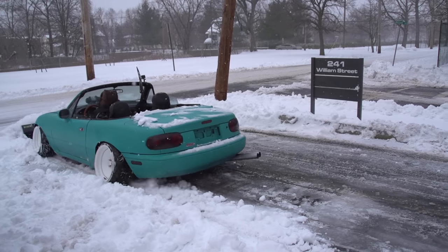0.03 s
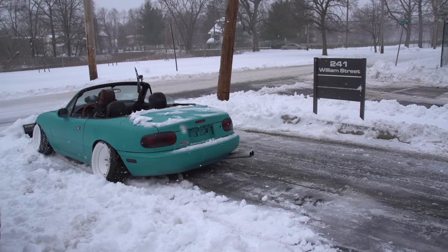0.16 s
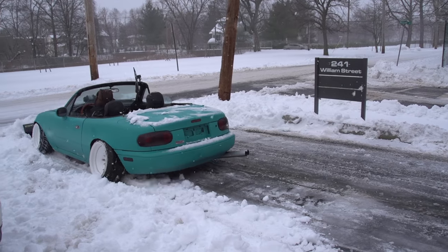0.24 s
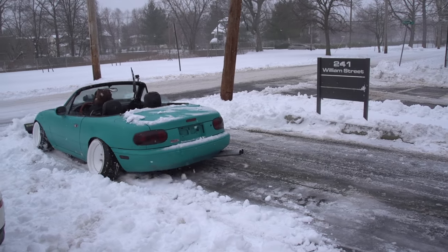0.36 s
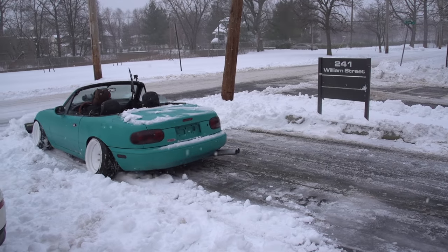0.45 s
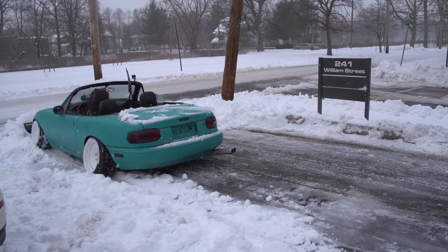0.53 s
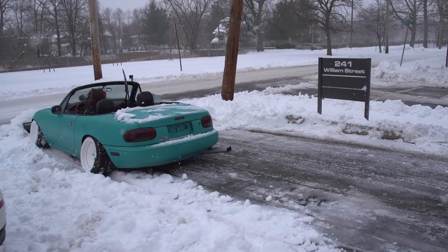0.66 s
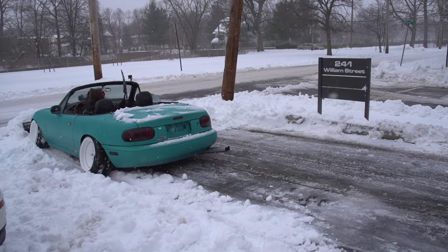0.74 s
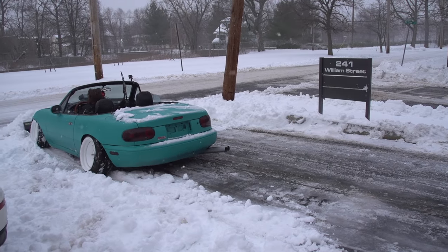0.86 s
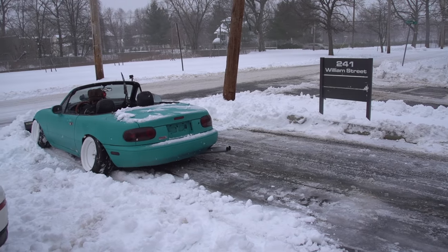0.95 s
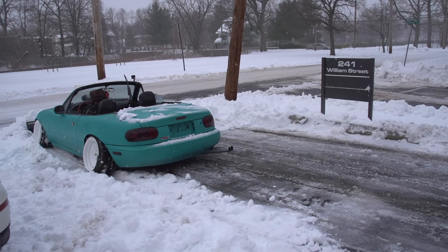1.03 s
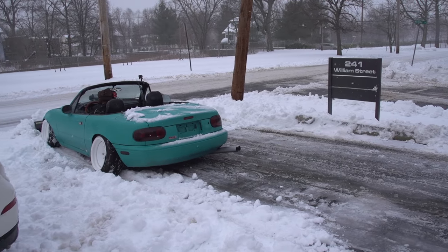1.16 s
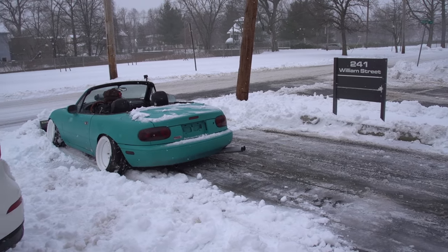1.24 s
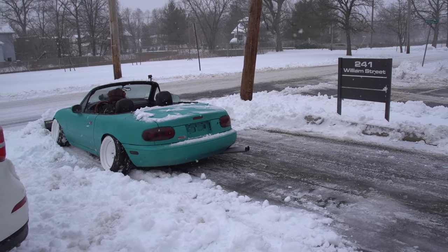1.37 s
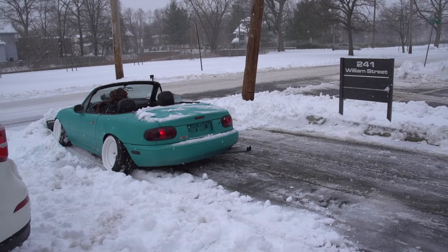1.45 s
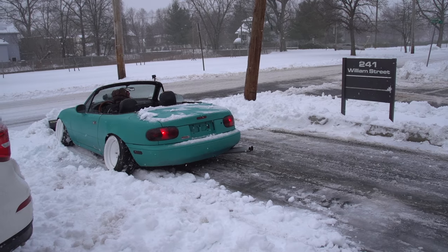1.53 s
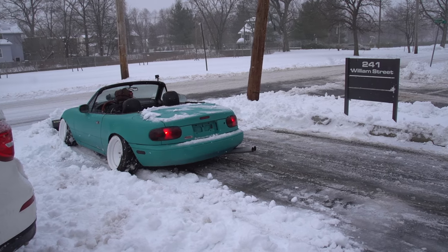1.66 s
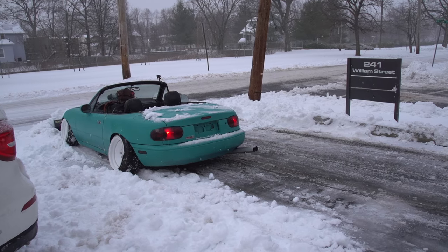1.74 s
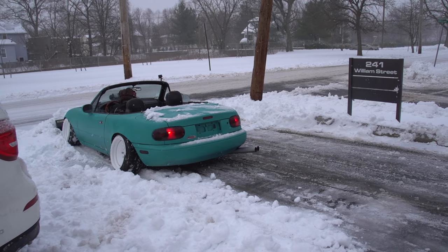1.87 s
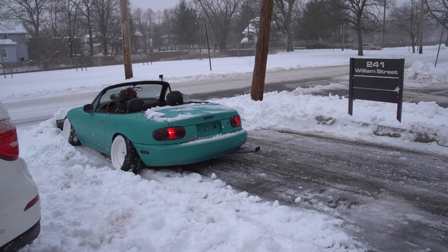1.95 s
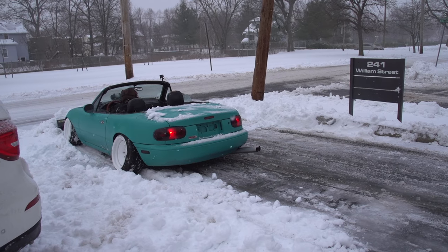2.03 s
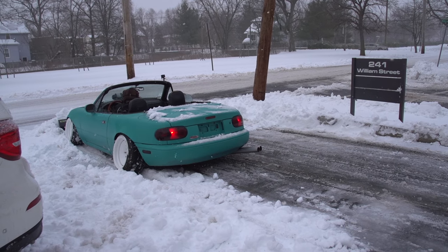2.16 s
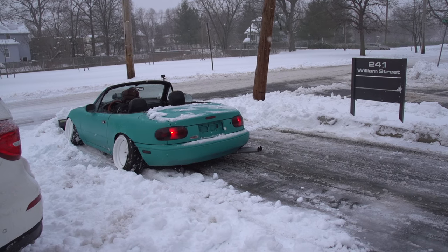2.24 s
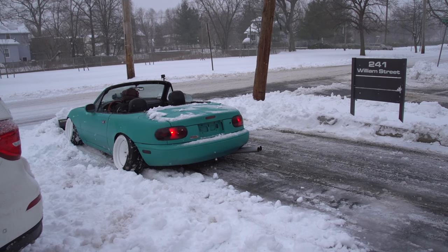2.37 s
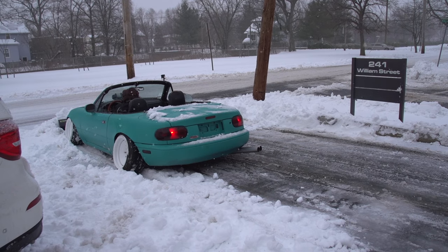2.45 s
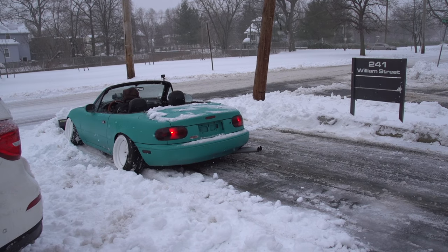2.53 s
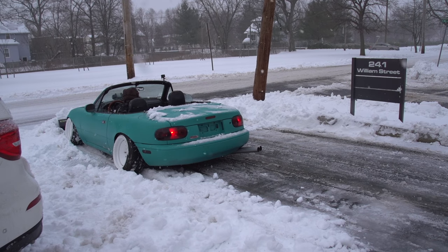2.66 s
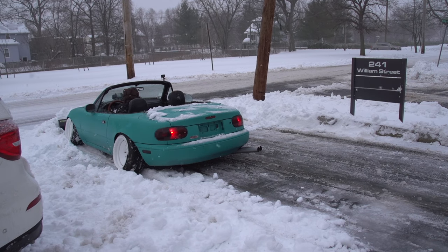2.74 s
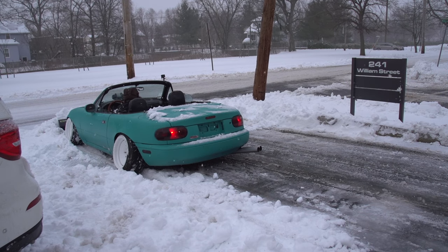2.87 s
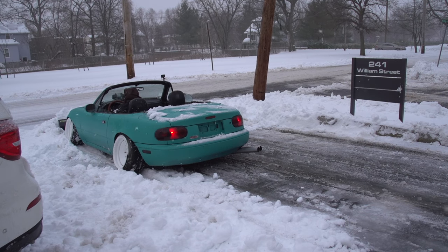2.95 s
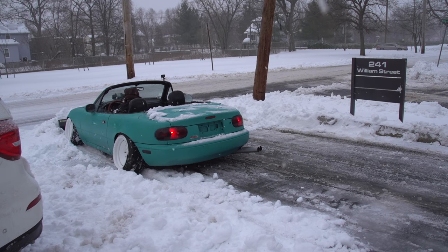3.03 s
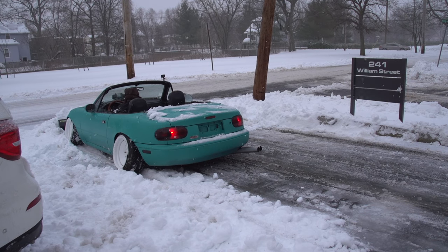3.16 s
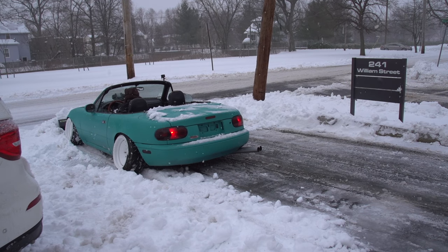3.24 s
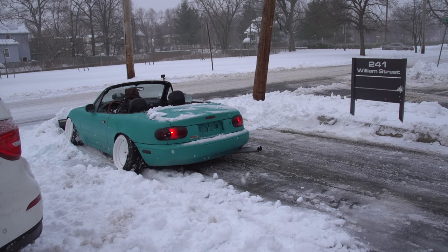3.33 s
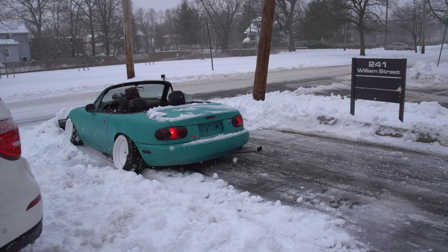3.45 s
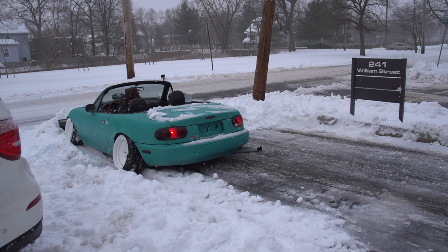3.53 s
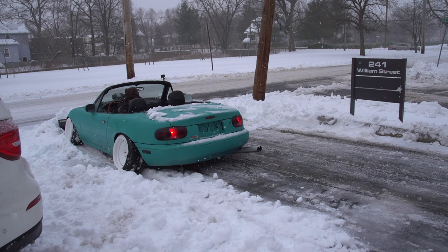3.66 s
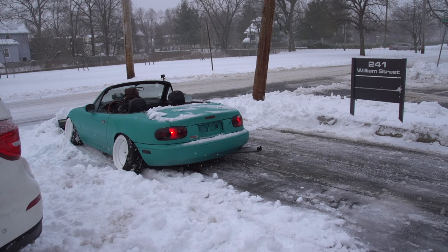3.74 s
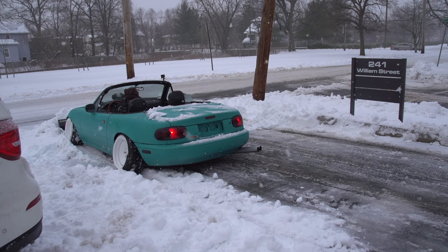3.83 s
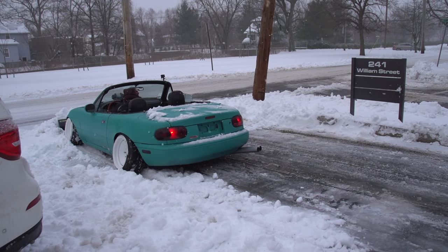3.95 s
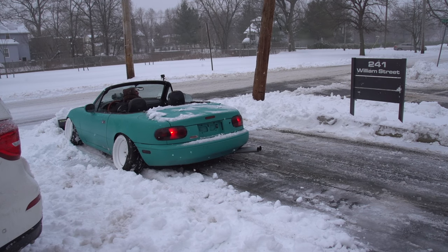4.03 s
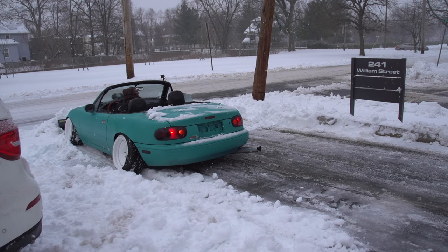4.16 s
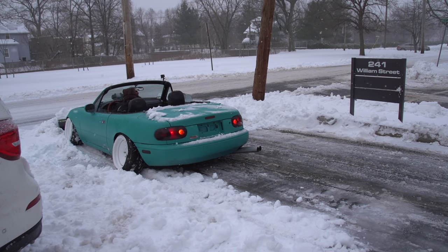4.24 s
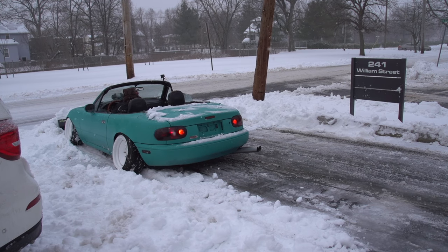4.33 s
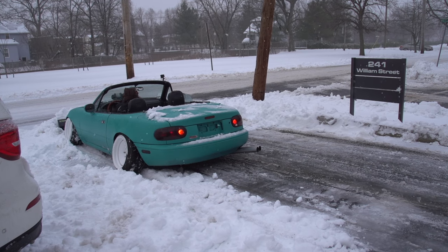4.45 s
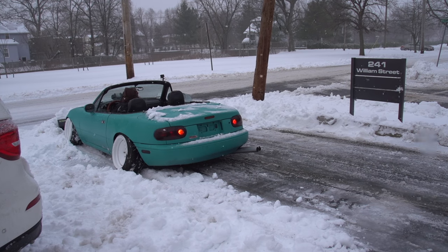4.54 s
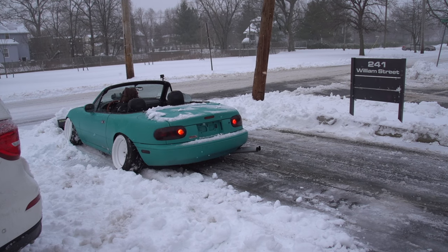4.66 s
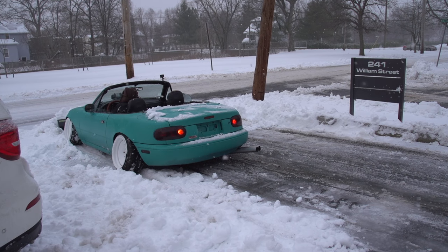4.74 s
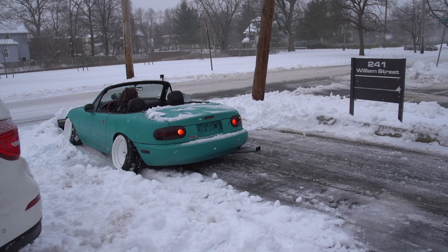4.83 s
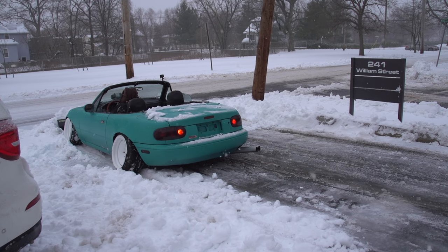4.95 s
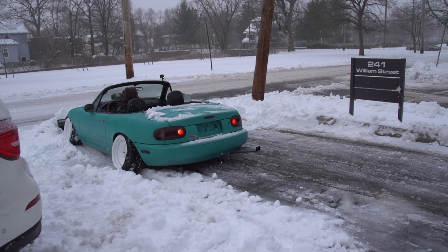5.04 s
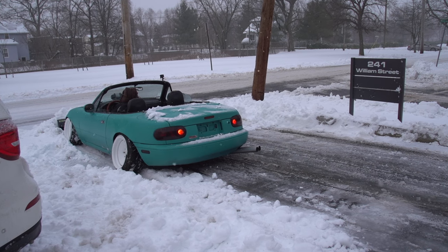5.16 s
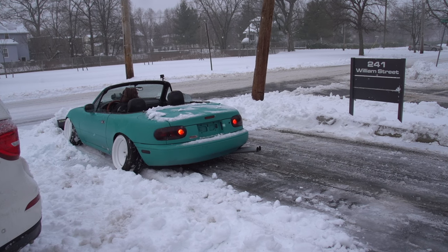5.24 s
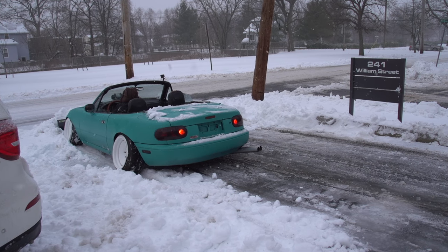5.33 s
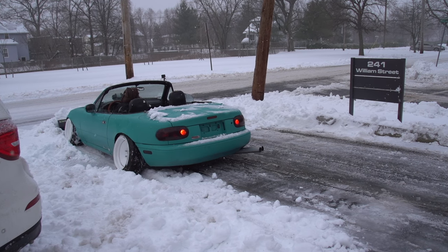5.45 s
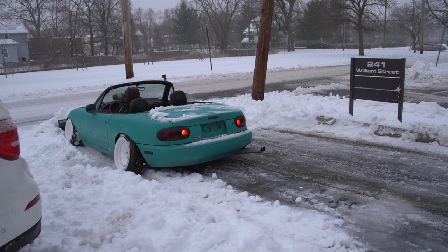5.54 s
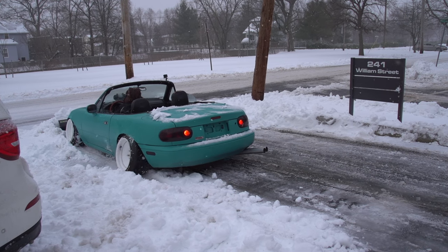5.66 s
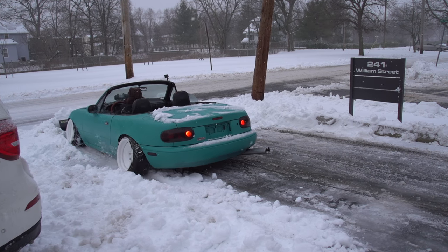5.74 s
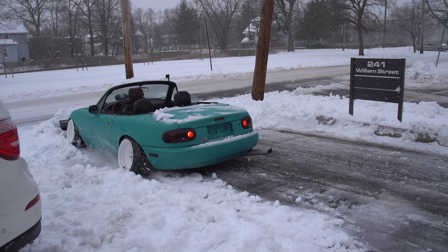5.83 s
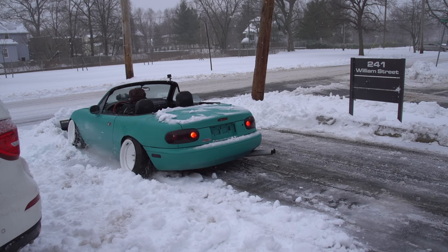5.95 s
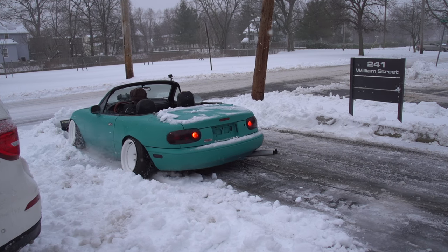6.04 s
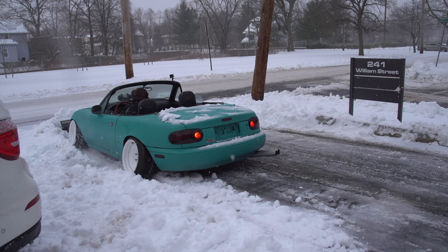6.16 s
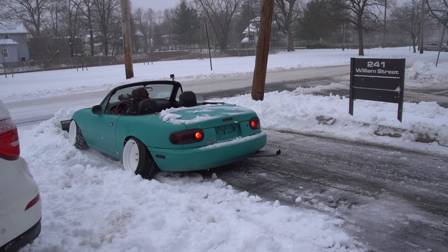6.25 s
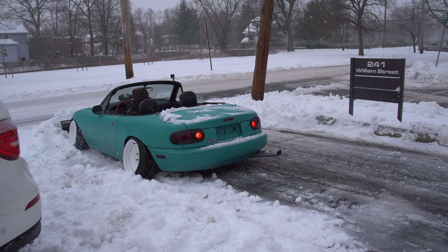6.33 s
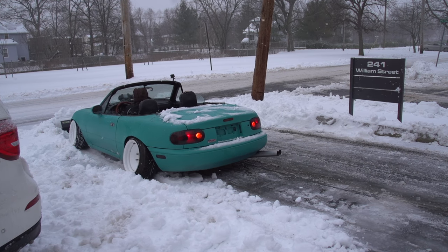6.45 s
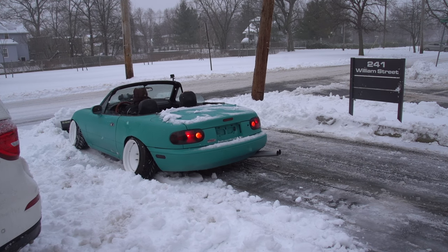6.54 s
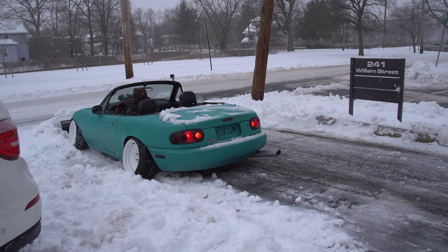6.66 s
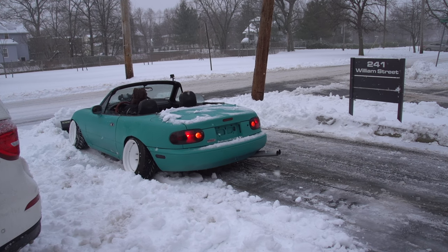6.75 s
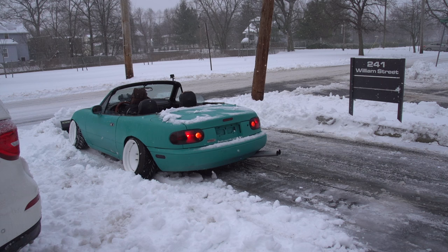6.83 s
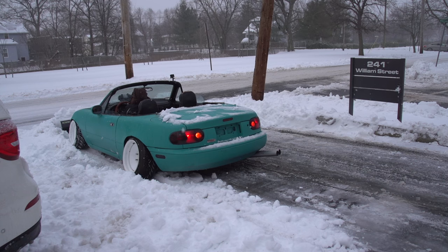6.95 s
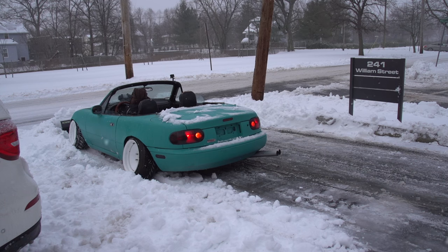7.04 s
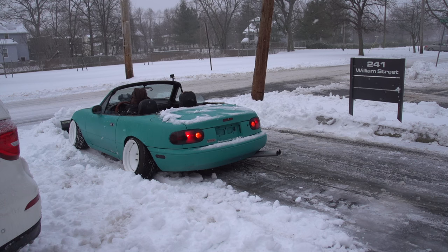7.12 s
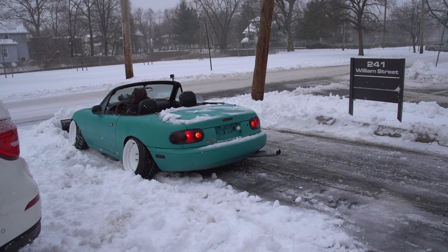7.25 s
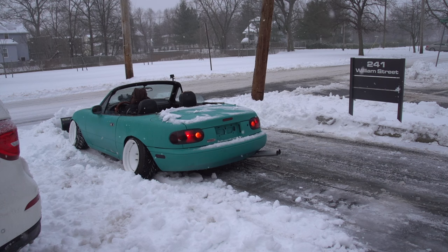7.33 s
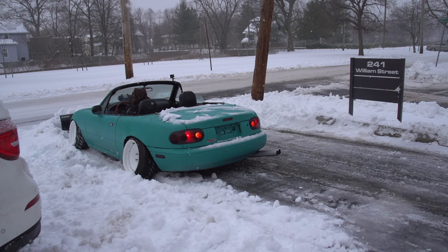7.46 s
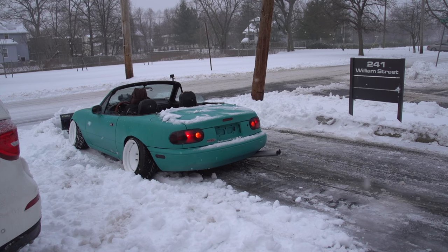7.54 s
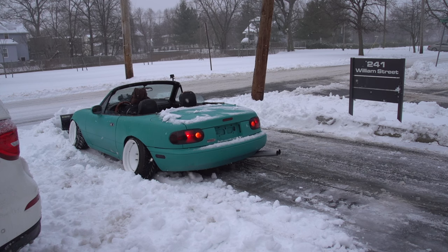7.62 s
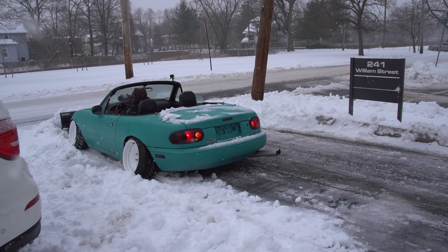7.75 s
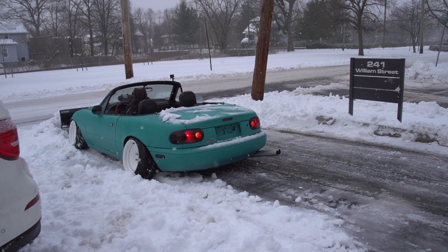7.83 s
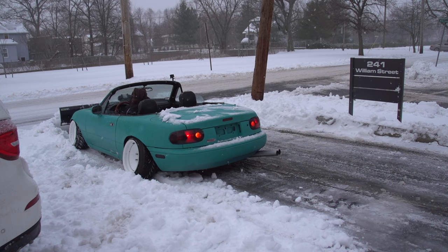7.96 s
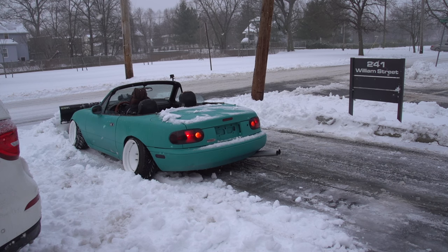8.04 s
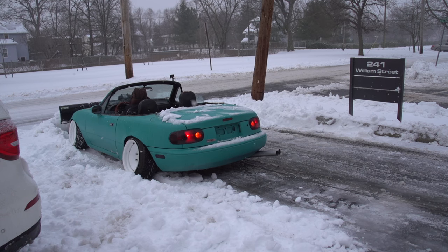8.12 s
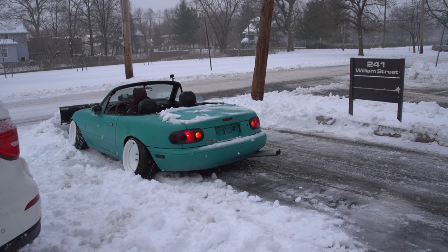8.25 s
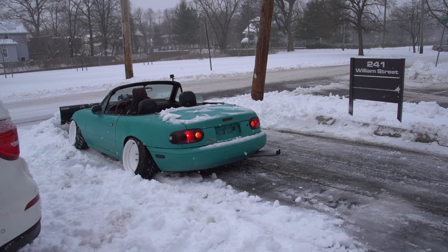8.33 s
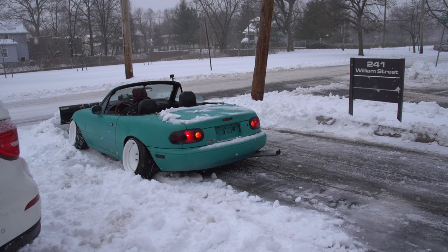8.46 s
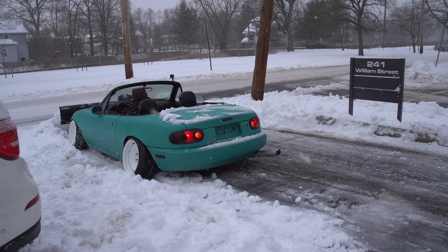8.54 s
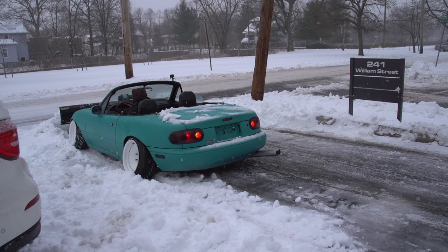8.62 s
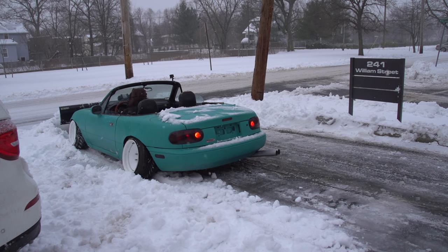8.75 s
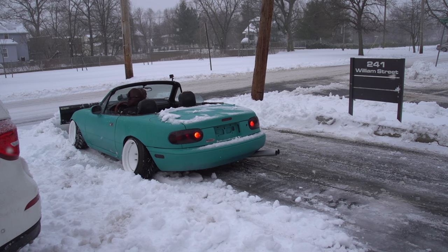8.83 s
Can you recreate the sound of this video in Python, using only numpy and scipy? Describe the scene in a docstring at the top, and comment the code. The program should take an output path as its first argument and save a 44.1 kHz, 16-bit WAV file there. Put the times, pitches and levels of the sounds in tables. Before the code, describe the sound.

A small car's low, lumpy exhaust throbs outdoors while tyres hiss and crunch softly in snow and chain links tick. It lifts briefly, settles, and a loud steel plough clank rings out. Later the engine coughs, stumbles and revs into a hoarse pitched howl, then burbles down with pops. An electric winch whirrs twice in short bursts before the idle recovers. Mono, fairly close, dry, no echo.

```python
"""A four-cylinder engine works against snow: each firing rings the exhaust pipe and puffs out noisy gas.
It lifts briefly, settles, stumbles in short dips, revs once into a pitched howl, sinks low and recovers.
Tyres hiss and crunch as shaped noise and tiny snaps; one creaks as a short train of stick-slip pulses.
The plough clanks with noise bursts and ringing steel modes, and loose chain links tick.
An electric winch runs twice, built from wavering gear partials, noise and grit, over a low hum of air."""
import sys
import numpy as np
from scipy import signal
from scipy.fft import rfft, irfft
from scipy.io import wavfile
from scipy.ndimage import uniform_filter1d

SR = 44100
rng = np.random.default_rng(int(sys.argv[2]) if len(sys.argv) > 2 else 0)


def unload_wav(signal):
    """Save mono or channel-first audio to the path in sys.argv[1] as 16-bit WAV at rate SR, clipped to [-1, 1]."""
    wavfile.write(
        sys.argv[1],
        SR,
        np.round(np.clip(np.atleast_2d(signal).T, -1, 1) * 32767).astype(np.int16),
    )


N = 392049
T = np.arange(N) / SR  # s
EDGE_HZ = 16050  # top of the output band

# low hum of the open air: [f/Hz, level/dB]
AIR_COLOUR = [(15, -6.5), (50, -16.5), (150, 3), (300, 0), (700, -29), (2000, -31.5), (6000, -58),
              (15000, -63)]

# slush hiss and snow crunch: [f/Hz, level/dB]
HISS_COLOUR = [(1000, -39.5), (2800, 0), (4500, -0.5), (7000, 2), (10000, 3.5), (12500, -1.5), (15500, -8)]
CRUNCH_COLOUR = [(300, -8), (800, 1.5), (1300, -3), (2000, -2.5), (2800, -11), (4500, -17), (10000, -22.5)]
# the car shoves through snow: [middle t/s, half length t/s, slush hiss level/dB, crunch level/dB]
SHOVES = [(0,0.21,-55.5,-46),(0.356,0.068,-62,-45),(0.576,0.08,-67,-46.5),(1.034,0.066,-56.5,-46.5),(1.3,0.25,-56,-57.5),(1.885,0.18,-55,-54.5),(2.214,0.08,-52.5,-47),(2.5,0.076,-55,-56.5),(2.837,0.14,-50,-47.5),(3.345,0.36,-55.5,-56.5),(3.7,0.35,-55.5,-51.5),(4.474,0.14,-60.5,-51.5),(4.697,0.061,-50,-50),(5.117,0.11,-52.5,-49.5),(8.494,0.1,-51,-56),(8.89,0.16,-51,-49)]
# steady tyre noise at idle effort, its growth in dB per dB of effort, crunch of wheels spinning at high revs
TYRE_HISS_DB, TYRE_CRUNCH_DB, TYRE_GROWTH, SPIN_CRUNCH_DB = -64, -60, 0.18, -45

# creaking tyre: [f/Hz, level/dB]
RUBBER_COLOUR = [(600,-38),(1500,-9),(2600,3),(3400,-14),(14000,-14)]
# centre and half length of the creak, slips per second, level
JUDDER_S, JUDDER_HALF_S, JUDDER_PER_S, JUDDER_DB = 0.96, 0.02, 280, -46

# ticks of the slack chain's links: [t/s, level/dB]
TICKS = [(.028,-45),(0.078,-45),(.165,-47),(.185,-45),(0.236,-42),(.308,-41.5),(.524,-43.5),(.579,-48),(1.774,-37),(1.815,-34),(1.952,-42.5),(1.972,-38),(2.183,-37.5),(3.169,-37.5),(4.057,-38.5),(4.08,-35.5),(4.103,-40),(6.495,-44.5),(6.567,-45),(6.774,-50),(6.884,-43.5)]
# thin ring of the links: [f/Hz, level/dB]
LINK_RING_COLOUR = [(7000,-36),(8100,-1),(8800,-20),(9700,-7),(10600,-18),(12000,-53)]
# time constants of rattle and ring; gains of the dry crack and the ring
TICK_DECAY_S, LINK_RING_S, TICK_CRACK_DB, LINK_RING_DB = 0.0088, 0.031, -8.5, -19

# knocks of plough and chain: [t/s, strength level/dB, thud relative level/dB, chain jingle relative level/dB,
# decay t60/s, ring level/dB, two favoured modes f/Hz]
CLANKS = [(.339,-42,-10,1,0.038,-56,2540,9580),(0.596,-43.5,-12,5,0.047,-54,2540,8390),(1.456,-17.5,2,1.5,0.092,-23,4000,8390),(1.509,-26.5,-7.5,5.5,0.052,-33,6060,9580),(1.589,-34,-22,1,0.035,-43.5,3670,7900),
          (1.782,-36,4,12,0.097,-47,8390,7900),(1.86,-33,-25,-0.5,0.065,-40.5,2540,5420),(3.354,-47,7.5,10,.16,-54,6720,9580),
          (3.823,-32,10,14,0.015,-39,1790,7900),(3.913,-37.5,8.5,12,0.047,-54,7900,4730),(4.438,-53,24,-8,0.03,-58,2540,1790),(4.515,-41.5,20,7.5,0.11,-36.5,5420,6720),
          (6.522,-29,7.5,-4.5,0.037,-37.5,1790,8390),(6.84,-47,9.5,2.5,0.045,-58,1790,6720),(7.195,-42.5,11,1,0.1,-50,4000,2540),(8.568,-32.5,7,0,0.033,-52,6720,5420)]
# modes of the plough's steel: [f/Hz, level/dB, t60/s]
STEEL_MODES = [(1790,8,.035),(2540,-1,.13),(3670,0,.1),(4000,-4,.09),(4730,0,.12),(5420,0,.12),(6060,-1,.16),(6720,-3,.14),(7900,-5,.16),(8390,-5,.14),(9580,-5,.2)]
# crack, thud of the blade and jingle of chain: [f/Hz, level/dB]
CRACK_COLOUR = [(300, -13), (1200, -7), (1800, 18.5), (2700, 14), (4000, 19.5), (5200, 17.5), (6500, 16.5),
                (8500, 6.5), (15500, -7)]
THUD_COLOUR = [(30, -20), (120, -15), (340, 6.5), (520, -5), (800, -3.5), (1300, -10), (2000, -10),
               (4000, -27), (12000, -89)]
JINGLE_COLOUR = [(3000, -49), (6500, 1), (8200, 5), (10500, 3.5), (13000, -2.5), (15500, -10)]
# how much weaker the other modes ring, the reach of a favoured mode, time constant of the onset
OTHER_MODES_DB, FAVOUR_WIDTH_HZ, KNOCK_RISE_S = -12, 250, 0.0012

# winch runs: [on t/s, off t/s, level/dB, attack time constant t/s]
WINCH_RUNS = [(7.181,7.512,-32.5,0.093),(7.62,8.104,-32.5,0.03)]
# gear mesh pitch: [t/s, f/Hz]
WINCH_MESH = [(7.18,590),(7.3,700),(7.36,705),(7.44,665),(7.51,695),(7.62,620),(7.71,675),(7.78,640),(7.86,660),(7.93,730),(8.03,795),(8.11,735)]
# ring of the winch housing: [f/Hz, level/dB]
WINCH_COLOUR = [(200,10.5),(450,0.5),(700,1.5),(950,-5),(1450,-4.5),(1700,-8.5),(1900,-5.5),(2200,-12),(2370,-3),(2600,-13.5),(3500,-17),(3900,-10),(4100,-15),(4600,-17),(5700,-9),(7000,-15),(8300,-19),(8950,-15),(9700,-18),(11500,-20),(12100,-19),(14000,-32)]
# fade after switching off, fast flutter of the mesh pitch (fraction), depth of the gears' chatter
COAST_DB_PER_S, MESH_FLUTTER, CHATTER_DB = 560, 0.011, 0.6

# engine speed: [t/s, firing rate f/Hz]
SPEED = [(0,27.3),(.12,27.8),(.41,30.7),(.58,31.4),(.7,35),(.8,41),(.92,39.8),(1.17,35.2),(1.42,28.5),(1.65,27.6),(2.4,27.9),(4.6,27.65),(4.72,36),(4.95,41),(5.1,56),(5.2,66.5),(5.296,77.2),(5.338,79.6),(5.38,80.8),(5.46,81.8),(5.71,79.2),(5.81,81.2),(5.87,80.4),(5.95,78),(6.2,64.9),(6.3,58.7),(6.42,53),(6.7,39),(7,29.2),(7.56,23.6),(7.8,24.2),(8.44,28.2),(8.89,28.1)]
# how hard the engine works: [t/s, exhaust level/dB]
EFFORT = [(0,-17.5),(.68,-17.5),(.86,-24),(1.6,-27.5),(2,-24.5),(3.7,-22),(4.6,-22),(4.69,-11),(4.8,-22),(5.03,-13),(5.4,-12.5),(5.85,-14),(5.92,-19.5),(5.99,-22),(6.14,-20),(6.27,-18),(6.42,-21.5),(6.85,-33.5),(8.3,-25.5),(8.45,-19.5),(8.89,-22.5)]
# the exhaust weakens for a moment: [from t/s, to t/s, level/dB]
DIPS = [(4.829, 4.843, -10), (4.87, 4.958, -7.5), (5.127, 5.176, -3), (5.263, 5.305, -4.5)]
# single hard firings and pops: [t/s, boom level/dB, bark of gas level/dB]
COUGHS = [(4.664,16,-29.5),(4.69,18,-28.5),(4.719,20.5,-42),(4.853,15.5,-26.5),(5.022,8,-28),(6.021,15.5,-29),(6.096,10.5,-35),(6.215,2,-34),(6.436,5,-34.5),(6.65,-11,-36),(6.774,-18,-47)]
# strength of each cylinder's push: [level/dB]
CYLINDERS_DB = [-0.13, -1.6, 0.15, -1]
# pipe at idle, under load, on the overrun and after a cough: [f/Hz, level/dB]
PIPE_IDLE = [(15, -115), (28, -13), (55, 4), (84, 7), (111, 3.5), (140, 5.5), (168, -2.5), (196, 6),
             (222, -11), (255, -10), (300, -25.5), (390, -14), (700, -32), (2000, -87.5)]
PIPE_LOAD = [(22, -70.5), (42, -11), (64, 4), (82, -15.5), (112, -3.5), (152, 10), (175, -1.5), (205, -9.5),
             (240, -14.5), (265, -8), (320, -19), (400, -17.5), (700, -39), (2000, -101)]
PIPE_OVERRUN = [(22,-60),(42,-12),(62,7.5),(85,-10.5),(120,0),(165,3),(215,-6.5),(265,-2.5),(320,-24),(700,-30),(2000,-76)]
PIPE_COUGH = [(20,-90),(45,7),(70,-1.5),(105,3.5),(135,11),(170,3),(215,-13),(420,-25.5),(700,-37),(2000,-66),(6000,-95)]
# gas: bark of a cough, rasp of the firings, howl at high revs: [f/Hz, level/dB]
BARK_COLOUR = [(100,-30),(300,19.5),(700,4),(1200,-1),(1800,-6.5),(2600,-15.5),(4000,-21.5),(15000,-29)]
RASP_COLOUR = [(100, -37.5), (200, -2), (270, -1.5), (340, 8), (450, 6.5), (650, 2), (850, -13),
               (1250, -17.5), (2000, -25), (3000, -34.5), (6000, -38.5), (15000, -44)]
HOWL_COLOUR = [(90,-33.5),(195,18.5),(235,16),(262,24),(345,4),(400,1),(445,6.5),(510,7.5),(565,13),(605,1),(645,11.5),(730,4),(800,-7),(880,3),(940,-5.5),(1130,-4.5),(1240,-1.5),(1320,-7.5),(1650,-12),(1755,-4.5),(1830,-18),(1940,-22),(2010,-3),(2130,-30),(2270,-14.5),(2900,-37.5),(4050,-34),(4140,-19.5),(4250,-39),(6000,-48),(15000,-79)]
BARK_DECAY_S = 0.017  # time constant
# unevenness (0-1): at idle, added when lugging, added when the firing rate falls by FALL_PER_S each second
UNEVEN_IDLE, UNEVEN_LUG, UNEVEN_FALL, FALL_PER_S = 0.17, 0.11, 0.29, 58
# the throttle opens as effort rises above idle, and stays open above a middling speed (firings per second)
IDLE_DB, OPEN_SPAN_DB, DRIVE_RATE, OPEN_SPAN_RATE = -20.5, 4.5, 31, 14
# gas level against the exhaust at GAS_REF_RATE firings per second, before the rush-to-howl blend,
# and what speed, load, howl and uneven firing add to it
GAS_REF_RATE, GAS_DB, GAS_DB_PER_OCTAVE = 18.7, -26, 4.5
GAS_LOAD_DB, GAS_HOWL_DB, GAS_UNEVEN_DB = 1, 1.5, -3
# the howl sets in over this range of firings per second
HOWL_FROM_RATE, HOWL_SPAN_RATE = 64, 16
# orders between the firing harmonics, waver of the high orders, loose gas noise against the orders
HALF_ORDER_DB, HOWL_WAVER, HOWL_NOISE = -5, 0.45, 0.42


def amp(db):
    """Decibels to gain."""
    return 10 ** (np.asarray(db) / 20)


def unit(x):
    """Scales to rms 1."""
    return x / np.sqrt(np.mean(x ** 2) + 1e-20)


def noise():
    """White noise of rms 1."""
    return rng.standard_normal(N)


def curves(rows):
    """Draws each column of a table of (t, ..) rows as a line over every sample."""
    s, *columns = np.transpose(rows)
    return [np.interp(T, s, c) for c in columns]


def running_rms(x, size=8000):
    """Level of x over several firings."""
    power = uniform_filter1d(uniform_filter1d(x ** 2, size), size)
    return np.sqrt(abs(power) + 1e-14)


def colour(x, spectrum, size=16384):
    """Minimum-phase filter of energy 1 with the given spectrum: it rings after each push."""
    hz, db = np.transpose(spectrum)
    f = abs(np.fft.fftfreq(size, 1 / SR))
    log_gain = np.log(amp(np.interp(np.log(f + 1), np.log(hz), db)))
    ring = np.fft.ifft(np.exp(np.conj(signal.hilbert(log_gain)))).real[:size // 2]
    return signal.oaconvolve(x, ring / np.linalg.norm(ring))[:N]


def wander(hz):
    """Random drift of rms 1 that fades out above the given rate."""
    rolloff = 1 + (np.fft.rfftfreq(N, 1 / SR) / hz) ** 4
    return unit(irfft(rfft(noise()) / rolloff, N))


def clicks(times, sizes):
    """One impulse at each time."""
    return np.bincount(np.clip(np.round(times * SR).astype(int), 0, N - 1), sizes, N)


def decay(x, seconds):
    """Lets each impulse die away exponentially with this time constant."""
    return signal.lfilter([1], [1, -np.exp(-1 / (seconds * SR))], x)


def grains(per_s, spread_db):
    """Random snaps of rms 1; a positive spread makes a few much larger, a negative one much smaller."""
    sizes = amp(spread_db * np.minimum(rng.exponential(1, N), 5)) * rng.choice([-1, 1], N)
    return unit((rng.random(N) < per_s / SR) * sizes)


def bounce(x, seconds, share, count=8):
    """Each push runs to and fro and returns ever weaker; all-pass taps leave the colour nearly unchanged."""
    returns = (share ** 2 - 1) * share ** np.arange(count)
    taps = clicks(seconds * np.arange(count + 1), np.append(share, returns))
    return signal.oaconvolve(x, taps[:SR // 2])[:N]


def high_revs(speed):
    """0 at low speed, near 1 where the gas flow locks to the firings."""
    return 0.985 * np.clip((speed - HOWL_FROM_RATE) / HOWL_SPAN_RATE, 0, 1)


def overrun(speed):
    """0-1: the throttle is shut and the revs drop from above a middling speed."""
    falling = np.clip(-np.gradient(speed) * SR / FALL_PER_S, 0, 1) ** 2
    fast = np.clip((speed - DRIVE_RATE) / OPEN_SPAN_RATE, 0, 1)
    return uniform_filter1d(falling, size=2000) * fast


def running_state(speed, effort_db):
    """Load and unevenness: lumpy when lugging, smoother with speed, burbling as the revs drop."""
    by_effort = np.maximum(effort_db - IDLE_DB, 0) / OPEN_SPAN_DB
    by_speed = np.maximum(speed - DRIVE_RATE, 0) / OPEN_SPAN_RATE
    load = np.clip(by_effort + by_speed, 0, 1)
    smooth = 0.78 * np.clip((speed - 40) / 20, 0, 1)
    uneven = (UNEVEN_IDLE + UNEVEN_LUG * load) * (1 - smooth) + UNEVEN_FALL * overrun(speed)
    return load, uneven


def open_air():
    """Steady noise coloured into a low outdoor hum."""
    return amp(-43) * colour(noise(), AIR_COLOUR)


def snow(speed, effort_db):
    """Tyres squeeze slush into a hiss of tiny bursts; packed snow crunches lower; shoves swell both."""
    push_db = TYRE_GROWTH * (effort_db - IDLE_DB)
    spin = amp(SPIN_CRUNCH_DB) * high_revs(speed) ** 2
    hiss_power = amp(TYRE_HISS_DB + push_db) ** 2
    crunch_power = amp(TYRE_CRUNCH_DB + push_db) ** 2 + spin ** 2
    for middle, half, hiss_db, crunch_db in SHOVES:
        swell = np.exp(-((T - middle) / half) ** 2)
        hiss_power = hiss_power + swell * amp(hiss_db) ** 2
        crunch_power = crunch_power + swell * amp(crunch_db) ** 2
    hiss = unit(colour(noise() + 0.42 * grains(per_s=1500, spread_db=8.5), HISS_COLOUR))
    crunch = unit(colour(noise() + 0.4 * grains(per_s=600, spread_db=-5.5), CRUNCH_COLOUR))
    # both flicker in level
    hiss = hiss * np.sqrt(hiss_power) * amp(1.4 * wander(41))
    crunch = crunch * np.sqrt(crunch_power) * amp(1.8 * wander(45))
    return hiss + crunch


def judder():
    """A tyre sticks and slips on the ice in a short creak."""
    slips = clicks(np.arange(0, T[-1], 1 / JUDDER_PER_S), None)
    swell = np.exp(-((T - JUDDER_S) / JUDDER_HALF_S) ** 2)
    return unit(colour(slips, RUBBER_COLOUR)) * amp(JUDDER_DB) * swell


def chain():
    """Loose links tick against each other as short noise bursts and ring on thinly."""
    s, db = np.transpose(TICKS)
    ticks = clicks(s, amp(db))
    rattle = decay(ticks, TICK_DECAY_S) * noise()
    ring = decay(ticks, LINK_RING_S) * noise()
    crack = amp(TICK_CRACK_DB) * colour(rattle, CRACK_COLOUR)
    return crack + colour(rattle, JINGLE_COLOUR) + amp(LINK_RING_DB) * colour(ring, LINK_RING_COLOUR)


def plough():
    """Each knock is a rattling crack, a dull thud of the blade, a jingle of chain and a ring of steel."""
    crack, thud, jingle, ring = np.zeros((4, N))
    for s, db, thud_db, jingle_db, t60, ring_db, *favoured_hz in CLANKS:
        span = slice(round(s * SR), round(s * SR) + SR // 4)
        t = T[span] - T[span][0]
        blow = amp(db - 60 * t / t60) * (1 - np.exp(-t / KNOCK_RISE_S))
        crack[span] += blow * rng.standard_normal(len(t))
        thud[span] += blow * amp(thud_db) * rng.standard_normal(len(t))
        jingle[span] += blow * amp(jingle_db) * rng.standard_normal(len(t))
        for hz, mode_db, mode_t60 in STEEL_MODES:
            # each knock favours its own two modes
            distance_hz = np.min(abs(hz - np.array(favoured_hz)))
            favour_db = OTHER_MODES_DB * (distance_hz > FAVOUR_WIDTH_HZ)
            mode_gain = amp(ring_db + mode_db + favour_db - 60 * t / mode_t60)
            ring[span] += mode_gain * np.sin(2 * np.pi * hz * t)
    return colour(crack, CRACK_COLOUR) + colour(thud, THUD_COLOUR) + colour(jingle, JINGLE_COLOUR) + ring


def winch(count=12):
    """Gear teeth mesh, chatter and grind, and ring the housing; the pitch follows a drawn curve."""
    hz = curves(WINCH_MESH)[0]
    gain = np.zeros(N)
    for on, off, db, attack in WINCH_RUNS:
        rise = 1 - np.exp(-np.maximum(T - on, 0) / attack)
        gain += rise * amp(db - COAST_DB_PER_S * np.maximum(T - off, 0))
    cycles = np.cumsum(hz * (1 + 0.01 * wander(25) + MESH_FLUTTER * wander(200))) / SR
    # the teeth bite unevenly: each partial swells and breaks up on its own
    steps = np.arange(0, T[-1], 1 / 35)
    mesh = np.zeros(N)
    for k in range(1, count):
        bite = np.interp(T, steps, 0.65 * rng.standard_normal(len(steps)) + 0.8)
        mesh += bite * np.cos(2 * np.pi * (k * cycles + rng.random()))
    mesh = unit(mesh) * (1 + 0.45 * wander(260))
    # grit scrapes at random and bounces in the housing
    grit = unit(bounce(grains(per_s=900, spread_db=3), seconds=0.0046, share=0.6))
    gears = colour(0.58 * mesh + 0.7 * noise() + 0.8 * grit, WINCH_COLOUR)
    return unit(gears * amp(CHATTER_DB * wander(60))) * gain


def firings(speed, cylinders_db, uneven):
    """One push per firing; the four cylinders differ, and rough running scatters strength and timing."""
    at = np.flatnonzero(np.diff(np.floor(np.cumsum(speed) / SR + 0.85)))
    strength, lag = rng.standard_normal((len(at), 2)).T * uneven[at]
    sizes = amp(np.resize(cylinders_db, len(at)) + 4.2 * strength)
    return clicks(T[at] + 0.04 * lag / speed[at], sizes)


def crank_orders(speed, sounding, count=110):
    """Stacks multiples of the crank speed, two firings a turn; each order wavers in strength and phase."""
    t, turns = T[sounding], np.cumsum(speed[sounding] / 2) / SR
    steps = np.arange(0, T[-1], 1 / 16)
    stack = np.zeros(len(t))
    for k in range(9, count):
        drift = rng.standard_normal(len(steps)) + 1j * rng.standard_normal(len(steps))
        waver = HOWL_WAVER * min(k / 30, 1)
        size = (1 + waver * np.interp(t, steps, drift)) * amp(HALF_ORDER_DB * (k % 2))
        stack += (size * np.exp(2j * np.pi * (k * turns + rng.random()))).real
    out = np.zeros(N)
    out[sounding] = unit(stack)
    return out


def rasp(pushes, turbulence, speed, gain):
    """Gas rushes out with each firing; at high revs it locks to the crank and turns into a pitched howl."""
    locked = high_revs(speed)
    sounding = locked > 0
    gas = pushes + 0.035 * turbulence + 0.02 * noise()
    rush = colour(gas * gain * np.sqrt(1 - locked) / running_rms(gas), RASP_COLOUR)
    flow = unit(crank_orders(speed, sounding) + HOWL_NOISE * noise() * sounding)
    # the mean undoes the silence that unit() counted in
    howl = colour(flow * np.sqrt(np.mean(sounding) * locked) * gain, HOWL_COLOUR)
    return amp(4 - 5 * locked) * rush + howl


def exhaust(speed, effort_db):
    """Firings ring the pipe, which booms under load; each also lets out a rasping puff of gas."""
    load, uneven = running_state(speed, effort_db)
    pushes = firings(speed, CYLINDERS_DB, uneven)
    turbulence = decay(pushes, 0.033) * noise()
    returning = bounce(pushes, seconds=0.0115, share=0.84)
    drive = returning + 0.04 * uneven * turbulence
    shut = overrun(speed)

    def pipe(x):
        """Blends idle, open throttle and overrun."""
        driven = x * (1 - shut)
        idle = colour(driven * (1 - load), PIPE_IDLE)
        return idle + colour(driven * load, PIPE_LOAD) + colour(x * shut, PIPE_OVERRUN)

    level_db = effort_db + sum(db * ((T > start) & (T < end)) for start, end, db in DIPS)
    # the firings are levelled first so that the boom follows the effort
    boom = pipe(drive * amp(level_db) / running_rms(pipe(drive)))
    cough_s, cough_db, bark_db = np.transpose(COUGHS)
    cough_boom = colour(clicks(cough_s, amp(cough_db)), PIPE_COUGH)
    bark = colour(decay(clicks(cough_s, amp(bark_db)), BARK_DECAY_S) * noise(), BARK_COLOUR)
    gas_db = (GAS_DB + GAS_DB_PER_OCTAVE * np.log2(speed / GAS_REF_RATE) + GAS_LOAD_DB * load
              + GAS_HOWL_DB * high_revs(speed) + GAS_UNEVEN_DB * uneven)
    return boom + cough_boom + bark + rasp(returning, turbulence, speed, amp(level_db + gas_db))


def scene():
    """Sums air, tyres, chain, plough, winch and exhaust in mono, with no room echo."""
    speed, effort_db = curves(SPEED)[0], curves(EFFORT)[0]
    tyres = snow(speed, effort_db) + judder()
    metal = chain() + plough() + winch()
    return (open_air() + tyres + metal + exhaust(speed, effort_db))[None]


def record(dry):
    """Limits the band with a steep linear-phase low-pass."""
    lowpass = signal.firwin(401, EDGE_HZ, window=("kaiser", 9), fs=SR)
    return signal.oaconvolve(dry, lowpass[None], "same")


dry = scene()
out = record(dry)
unload_wav(out)
```